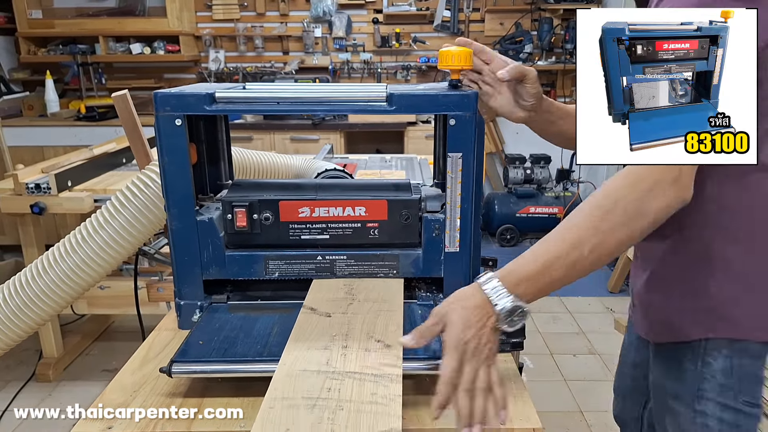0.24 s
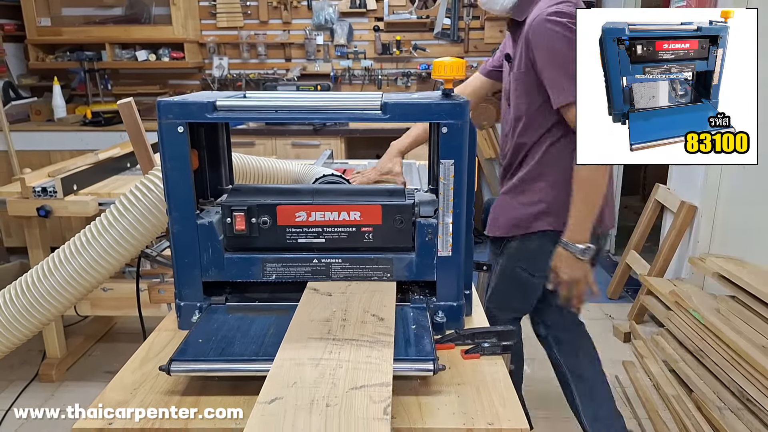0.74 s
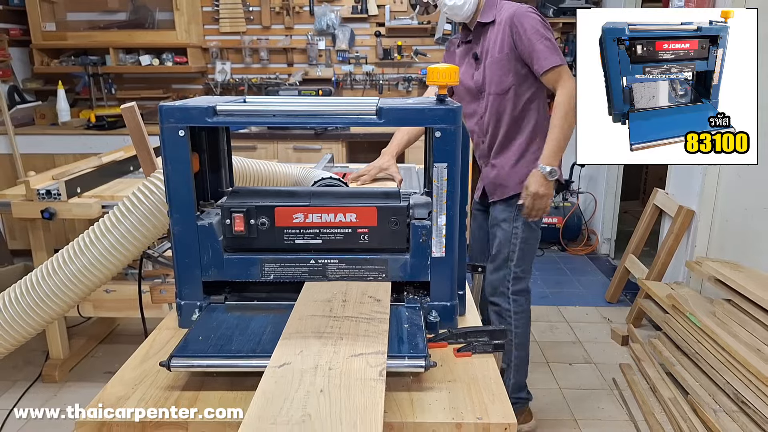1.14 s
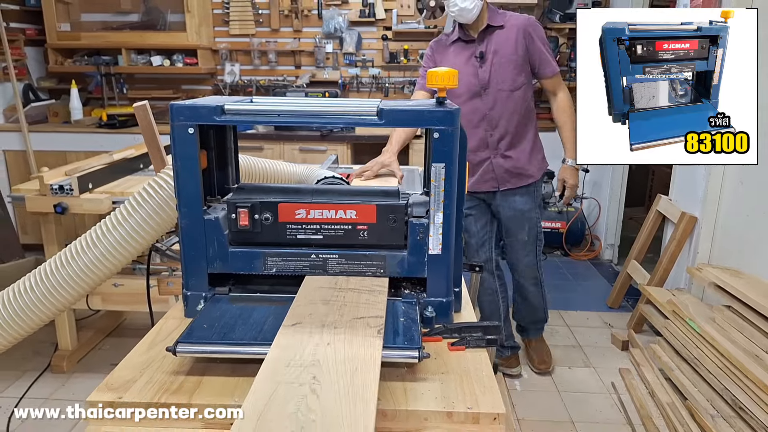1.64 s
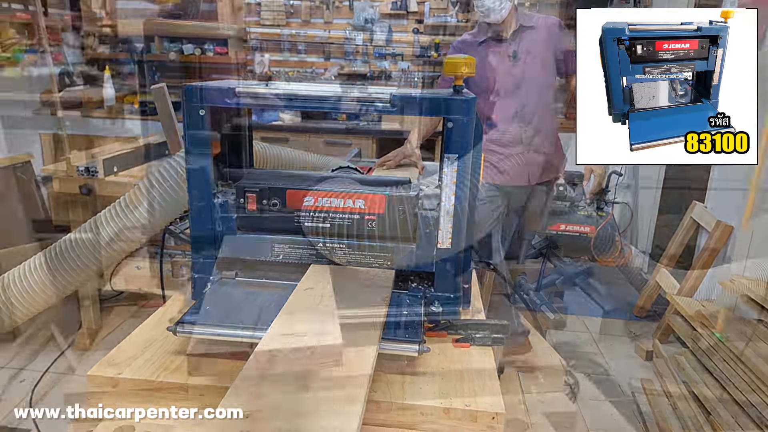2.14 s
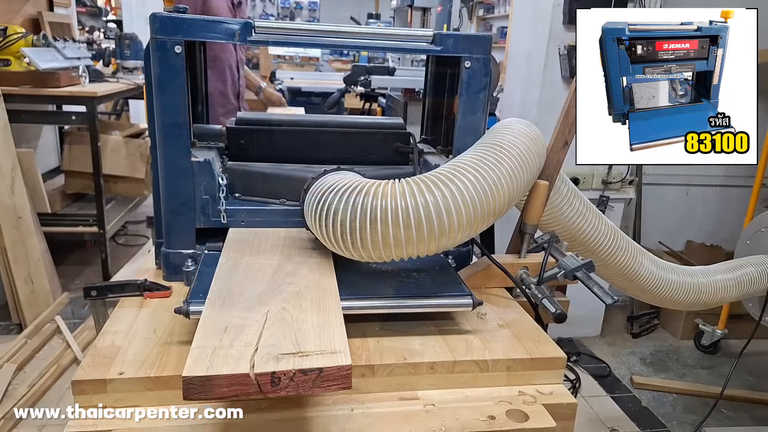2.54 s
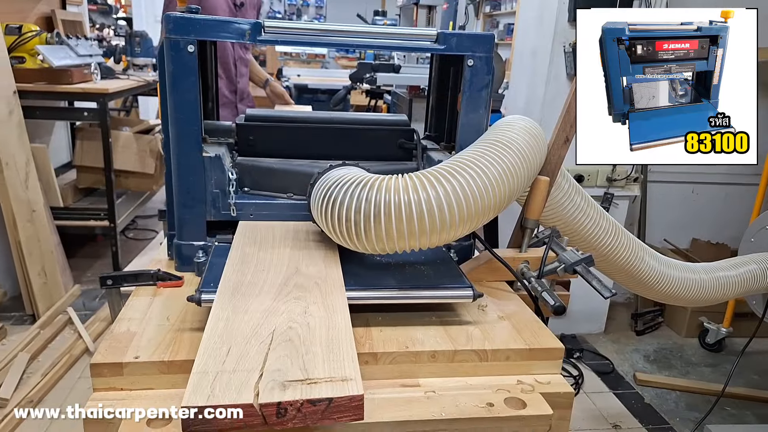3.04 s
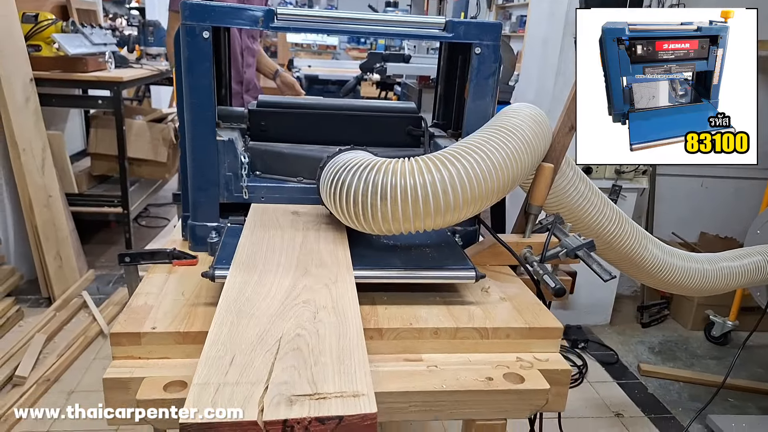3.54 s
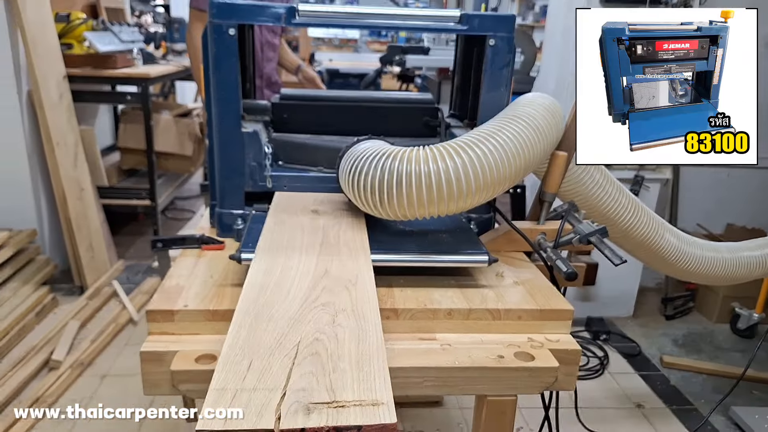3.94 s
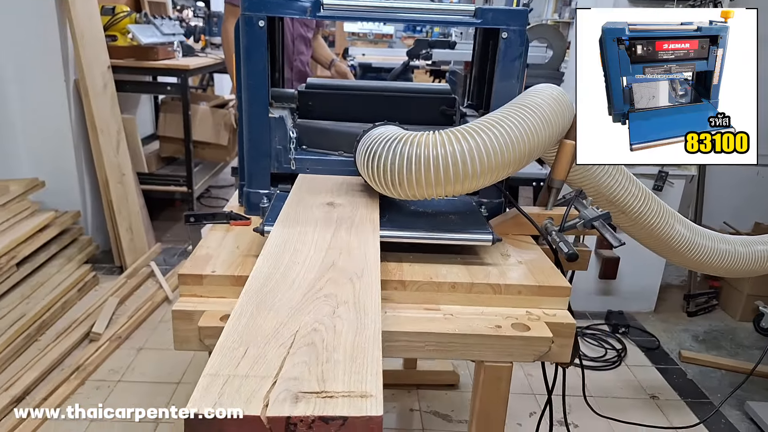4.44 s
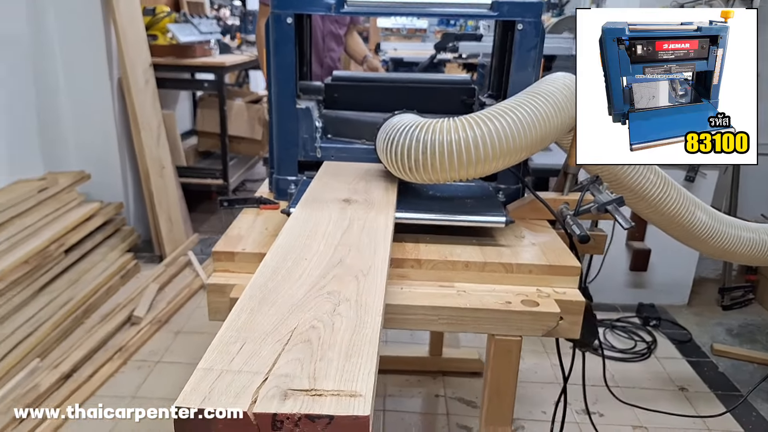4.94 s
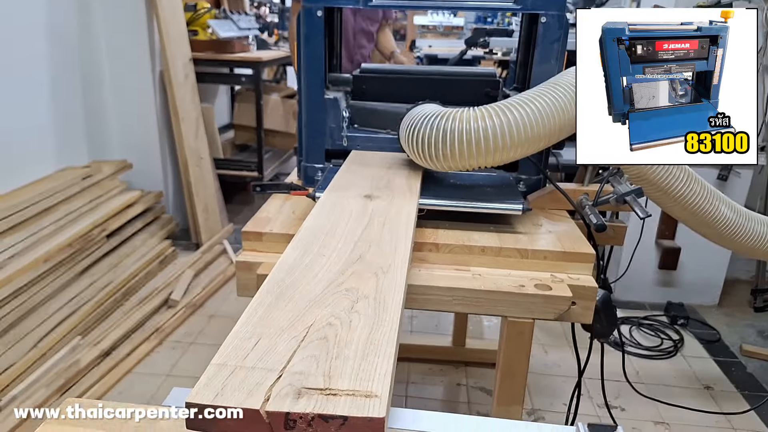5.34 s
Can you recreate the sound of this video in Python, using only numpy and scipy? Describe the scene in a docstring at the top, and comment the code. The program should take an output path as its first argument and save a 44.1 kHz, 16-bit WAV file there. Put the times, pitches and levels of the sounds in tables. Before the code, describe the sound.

Close stereo sound of a thickness planer already at work: fast knife strikes merge into a bright, gritty whine, with single overtones howling and fading. Chips hiss and air rushes. After about two seconds the front view blends into the lower, more muffled outfeed drone, steadier in pitch, with motor tones, belt growl and small low board knocks near the end.

```python
"""A benchtop thickness planer cuts a board, heard first at the infeed: periodic knife strikes sum to a whine
that sags with the load, while as the board moves single harmonics howl or fade.
With it sound chips and air (noise modulated at the strike rate), motor tones, belt growl and an extractor hum.
From 2.125 s to 3 s this dissolves into the duller whine of the outfeed, where chips rush into the dust hose.
From about 3 s on the board knocks on the bed now and then: short swells of a low tone and band noise."""
import sys
import numpy as np
from scipy import signal
from scipy.fft import rfft, irfft, next_fast_len
from scipy.io import wavfile
from scipy.ndimage import map_coordinates

SR = 44100
rng = np.random.default_rng(int(sys.argv[2]) if len(sys.argv) > 2 else 0)


def put_to_file(sound):
    """Save the sound as 16-bit audio at rate SR, in the file named by the first command-line argument."""
    columns = np.atleast_2d(sound).T  # one column per channel
    safe = np.clip(columns, -1, 1)
    whole_steps = np.round(safe * 32767)
    wavfile.write(sys.argv[1], SR, whole_steps.astype(np.int16))


N = 246959
TIME = np.arange(N) / SR
FRAME = 441  # samples between updates of the slowly varying levels
CYCLE = 1024  # points in one stored period of a waveform


def undb(db):
    """Logarithmic level: decibels to amplitude gain."""
    return 10 ** (np.asarray(db) / 20)


def curves(table, t=TIME):
    """Linear interpolation: the columns of a time table at times t, held at its ends."""
    s, *columns = np.transpose(table)
    return [np.interp(t, s, column) for column in columns]


def spectrum(points, hz):
    """Spectral envelope: level in dB interpolated over the logarithm of frequency."""
    f, db = np.transpose(points)
    return np.interp(np.log(hz + 1), np.log(f), db)


def shape(x, gain):
    """Linear filtering: multiply the spectrum by a gain given as a function of frequency."""
    size = next_fast_len(N)
    f = np.arange(size // 2 + 1) * SR / size
    return irfft(rfft(x, size) * gain(f), size)[..., :N]


def unit(x):
    """Normalization to an rms of 1."""
    return x / np.sqrt(np.mean(x ** 2))


def resonance(x, hz, width_hz):
    """Resonance: a steep band-pass about one frequency, scaled to rms 1."""
    return unit(shape(x, lambda f: 1 / (1 + ((f * f - hz * hz) / (f * width_hz + 1)) ** 2)))


def walks(t, rate, count):
    """Slow random modulation: smooth independent walks of spread 1, one column each, rate in knots per s."""
    knots = rng.standard_normal((512, count))
    place = t[:, None] * rate + rng.random(count)
    k, turn = place.astype(int), place % 1 * np.pi / 2
    column = np.arange(count)
    before = knots[k % len(knots), column]
    after = knots[(k + 1) % len(knots), column]
    return before * np.cos(turn) + after * np.sin(turn)  # keeps the spread constant


def ports(mid, side, wide_hz=1600, lag_ms=0.059):
    """Spatial coherence: two microphones agree in the low middle, not in rumble or treble; the left leads."""
    def apart(f):
        rumble = .62 / (1 + (f / 100) ** 4)
        return np.pi / 4 * (f / (f + wide_hz) + rumble)

    mid = shape(mid, lambda f: np.cos(apart(f)))
    side = shape(side, lambda f: np.sin(apart(f)))
    left = shape(mid + side, lambda f: np.exp(2j * np.pi * f * lag_ms / 10 ** 3))
    return np.array([left, mid - side])


def rotation(speed, flutter):
    """Phase integration: running count of knife passes; the speed flutters with the grain of the wood."""
    unsteady = 1 + flutter * walks(TIME, 45, count=1)[:, 0]
    return np.cumsum(curves(speed)[0] * unsteady) / SR


def chatter(turns, jitter):
    """Phase jitter (in passes): knives meet the wood early or late, which roughens the upper harmonics."""
    k = np.arange(int(turns[-1]) + 2)
    return turns + np.interp(turns, k, jitter * rng.standard_normal(len(k)))


def bite(turns, uneven, rough):
    """Amplitude modulation per strike: the two knives differ a little, and so does the wood under each."""
    k = np.arange(int(turns[-1]) + 2)
    strength = 1 + uneven * (-1.) ** k + rough * rng.standard_normal(len(k))
    return np.interp(turns, k, strength)


# Resonances of the moving board that build up and let go again, lifting the harmonics near them:
# (peak time [s], build [s], release [s], frequency [Hz], lift [dB])
HOWLS = [(0.02, 0.05, 0.12, 3825.0, 5.5), (0.05, .06, 0.052, 2915, 6), (0.06, 0.4, 0.15, 3595, 9.5),
         (0.1, 0.055, 0.11, 1560, 10), (0.14, 0.31, 0.45, 1775.0, 7), (0.16, 0.037, 0.071, 2215, 5),
         (0.18, 0.092, 0.16, 883.0, 12.5), (0.22, 0.52, 0.045, 2849.0, 8), (0.26, 0.42, 0.05, 653.0, 8),
         (0.3, 0.26, 0.06, 1510, 18), (0.38, 0.12, 0.2, 3585.0, 8.5), (0.4, 0.17, 0.11, 210.0, 12),
         (0.42, 0.05, 0.22, 5665.0, 4), (0.45, .05, .05, 3345, 2), (0.52, 0.069, .06, 4150, 3),
         (0.54, 0.16, 0.22, 1663.0, 9.5), (0.58, 0.059, 0.1, 2486.0, 9), (0.6, 0.06, 0.21, 5180.0, 13),
         (0.62, 0.13, 0.15, 4351.0, 10), (0.62, .1, 0.059, 1243, 2), (0.66, 0.082, 0.09, 828, 8.5),
         (0.76, 0.055, .06, 3930, 10.5), (0.74, 0.2, 0.077, 1449.0, 7), (0.84, 0.22, 0.13, 2055.0, 9.5),
         (0.96, 0.059, 0.072, 3050, 8), (0.98, .12, .12, 1825, 4), (1.0, 0.048, 0.09, 3240.0, 9),
         (1.05, 0.25, 0.18, 7850.0, 15), (1.25, 0.051, 0.067, 3220, 6), (1.26, 0.35, 0.25, 1007.0, 7),
         (1.34, 0.09, 0.16, 6071.0, 6), (1.35, 0.053, .06, 4252, 5), (1.38, 0.28, 0.45, 410, 3),
         (1.46, 0.061, 0.052, 821.0, 11), (1.65, 0.055, 0.065, 3330, 6), (1.7, .15, 0.16, 2500, 1),
         (1.76, .15, .1, 2925, 2), (1.78, 0.16, 0.087, 4821.0, 5), (1.78, 0.21, 0.14, 5659.0, 11.5),
         (1.85, 0.071, .07, 2718, 6), (1.85, .09, .08, 3972, 5.5), (1.85, .3, .3, 2095, 2.5),
         (1.9, .08, 0.099, 3550, 8), (2.0, .1, .1, 4420, 7), (2.06, 0.042, 0.054, 2961.0, 11.5),
         (2.06, 0.097, 0.13, 1269.0, 5.5), (2.1, 0.05, 0.23, 849.0, 8.5), (2.14, 0.097, 0.47, 5968.0, 7),
         (2.18, 0.076, 0.29, 428.0, 6), (2.8, 0.13, 0.11, 2015.0, 8), (2.9, 0.14, 0.05, 6978.0, 9),
         (2.98, 0.22, 0.047, 3862.0, 9), (2.95, 0.16, 0.16, 3125, 6.5), (3.1, 0.13, 0.18, 3325.0, 4.5),
         (3.16, 0.16, .17, 1660, 5), (3.3, .5, .5, 555, 3), (3.18, 0.05, 0.45, 5909.0, 6),
         (3.26, 0.036, 0.45, 925.0, 6), (3.42, 0.09, 0.097, 2769.0, 7.5), (3.5, 0.15, 0.044, 2215.0, 10),
         (3.68, 0.16, 0.21, 3143.0, 7.5), (3.8, 0.24, 0.088, 2590.0, 5), (3.86, 0.057, 0.052, 3888, 9),
         (3.9, .13, 0.069, 2035, 3), (2.9, 0.17, 0.27, 1120, 2.5), (3.92, 0.61, 0.08, 1109.0, 6),
         (3.95, .15, .15, 1665, 3.5), (3.96, 0.064, 0.069, 1470.0, 8.0), (4.02, 0.13, 0.09, 3845.0, 10),
         (4.27, 0.057, 0.038, 1105, 4.5), (4.28, 0.068, .1, 1472, 4.5), (4.33, 0.089, 0.065, 2375, 4),
         (4.44, 0.062, .06, 910, 7.5), (4.5, 0.34, 0.13, 2920.0, 6), (4.8, 0.08, 0.1, 3870, 11.5),
         (4.92, 0.27, .25, 2050, 3), (4.9, 0.48, 0.1, 2959.0, 5.5), (4.97, 0.19, 0.11, 3157.0, 6),
         (5.15, 0.21, 0.2, 2420.0, 6), (5.22, 0.23, 0.27, 2801.0, 11.5), (5.4, 0.057, 0.16, 2997.0, 8),
         (5.42, 0.64, 0.68, 750.0, 5.5), (5.5, 0.38, 0.099, 943.0, 6.5), (5.55, 0.089, 0.07, 1693.0, 5),
         (5.55, 0.14, 0.16, 1500, 4.5)]
# Moments when harmonics near one frequency fade and return; a negative depth makes them swell instead:
# (extreme time [s], onset [s], return [s], frequency [Hz], depth [dB])
FADES = [(0.05, .08, .1, 3140, 5), (0.18, 0.23, 0.13, 2460, 5), (0.22, 0.091, .07, 4300, 2),
         (0.25, .06, .06, 4180, 3), (0.35, 0.039, .04, 1275, 3), (0.42, 0.14, .06, 3200, 6),
         (0.46, 0.05, 0.25, 2700, 9), (0.47, 0.06, 0.23, 3753.0, 16), (0.7, 0.066, 0.07, 2277, 9),
         (0.86, 0.18, 0.05, 3400, -6), (1.0, 0.33, 0.35, 4420, 6.5), (1.15, .1, 0.17, 2005, 3),
         (1.2, .15, .08, 3810, 7), (1.34, 0.3, 0.097, 3930, 11.0), (1.46, 0.049, 0.13, 3720, 9),
         (1.55, 0.15, 0.3, 4130, 14.0), (2.12, 0.34, 0.21, 3177, 10), (2.26, 0.45, 0.15, 3900, 14),
         (2.27, .08, .15, 2365, 8), (3.18, 0.21, 0.05, 3500, 21), (3.3, 0.21, 0.13, 2036.0, 9),
         (3.34, 0.05, 0.49, 4160, 18), (3.82, 0.35, 0.05, 1470, 15), (3.86, 0.066, 0.1, 3518.0, 10),
         (3.94, 0.53, 0.074, 1842.0, 2), (3.96, 0.049, 0.088, 925, 7), (4.06, 0.06, 0.13, 732, 8),
         (4.25, 0.065, 0.066, 3153, 5), (4.1, 0.07, 0.09, 1092, 1), (4.44, 0.12, 0.15, 1100, 5),
         (4.8, 0.16, 0.25, 1470, 8), (4.86, 0.061, 0.044, 2790, 13), (4.86, 0.1, 0.15, 1658, 13),
         (4.86, 0.076, 0.45, 1820, 17), (4.86, 0.2, 0.25, 3480, 9), (5.06, 0.05, 0.36, 1500, 3.5),
         (5.25, .05, .05, 3080, 8.5), (5.3, 0.12, 0.05, 2270, 9), (5.42, 0.12, 0.12, 2670, 21),
         (5.46, 0.056, 0.25, 2035, 25), (5.56, 0.091, .1, 3385, 6), (5.58, 0.11, .1, 1129, 7)]


def howls(t, f, width_hz=77):
    """Resonant gain and selective fading: change in dB of harmonics at frequencies f (times x harmonics)."""
    lift = 0
    for table, sign in ((HOWLS, 1), (FADES, -1)):
        for s, build, release, hz, db in table:
            swell = np.exp(-((t - s) / np.where(t < s, build, release)) ** 2)
            nearness = 1 / (1 + ((f - hz) / width_hz) ** 2) ** 2
            lift = lift + sign * db * swell[:, None] * nearness
    return lift


def harmonics(t, f, cut, strike, treble, whine_db, patchy_db, flicker_db,
              patchy_rate=5, flicker_rate=30, low_share=0.54):
    """Fourier series: each harmonic's level in dB at times t, from strike shape, cut and random unrest."""
    low_hz, treble_hz = 1650, 3410  # lower harmonics follow the cut less; above treble_hz the treble level rules
    middle_db, treble_db = curves(cut, t)
    _, usual_db, usual_treble_db = np.mean(cut, axis=0)
    order = np.arange(1, len(f) + 1)
    k, strike_db = np.transpose(strike)
    shape_db = np.where(order <= len(k), np.interp(order, k, strike_db), spectrum(treble, f))
    top = (f > treble_hz).astype(float)
    middle = np.clip(f / low_hz, 0, 1) ** 2 * (1 - top)
    db = shape_db + usual_db + whine_db
    db = db + np.outer(middle_db - usual_db, middle) + np.outer(treble_db - usual_treble_db, top)
    # the moving board shifts the standing waves, so harmonics come and go, the low ones less
    unrest = patchy_db * walks(t, patchy_rate, count=len(f))
    unrest = unrest + flicker_db * walks(t, flicker_rate, count=len(f))
    return db + np.interp(f, (low_hz * 2 / 3, low_hz), (low_share, 1)) * unrest


def ringing(db):
    """Minimum phase: the phases, from the cepstrum, of a sharp blow followed by the ring of its resonances."""
    cepstrum = irfft(np.pad(db, ((0, 0), (1, 0)), mode="edge") * np.log(10) / 20)
    cepstrum[:, cepstrum.shape[1] // 2:] = 0
    return 2 * rfft(cepstrum).imag[:, 1:]


def knives(turns, speed, cut, strike, treble, whine_db, smear, patchy_db, flicker_db, spread, lag_ms,
           pan_db=-1.6, direct=0.97):
    """Periodic excitation: one strike per knife pass, summed from 80 harmonics for each microphone."""
    t = np.arange(N // FRAME + 2) * FRAME / SR
    hz = np.outer(curves(speed, t)[0], np.arange(1, 81))
    f = np.mean(hz, axis=0)
    lift_db = howls(t, hz)
    db = harmonics(t, f, cut, strike, treble, whine_db, patchy_db, flicker_db) + lift_db
    # reflections scatter the phases (smear in radians) and so spread the strike in time
    phase = ringing(db) + smear * walks(t, 1.271, count=len(f))
    # they reach each microphone differently; howling harmonics arrive more directly
    diffuse = spread * f / (f + 750) * undb(-direct * np.maximum(lift_db, 0))
    level_walk = 0.47 * walks(t, 3.426, count=len(f))
    phase_walk = walks(t, 3.525, count=len(f))
    pan = np.log(undb(pan_db / 2)) * np.clip(f / 2000, 0, 1)
    lead = np.pi * f * lag_ms / 10 ** 3
    between = diffuse * (level_walk + 1j * phase_walk) + pan + 1j * lead  # half the log ratio, left to right
    balance = np.sqrt(np.cosh(2 * between.real))  # keeps the summed power of the two sides
    out = []
    for sign in (1, -1):
        partials = undb(db) * np.exp(1j * phase + sign * between) / balance
        cycle = irfft(np.pad(partials, ((0, 0), (1, 0))), CYCLE) * CYCLE / np.sqrt(2)
        place = [np.arange(N) / FRAME, turns % 1 * CYCLE]
        out.append(map_coordinates(cycle, place, order=1, mode="grid-wrap"))
    return np.array(out)


def tumble(x, depth_db, rate=32, per_octave=4.06, knee_hz=600):
    """Band-wise modulation: chips tumble in clumps of many sizes, so the middle bands flare separately."""
    f, t, z = signal.stft(x, SR, nperseg=512)
    bands = per_octave * np.log2(1 + f / knee_hz)
    band, frame = np.meshgrid(bands, np.arange(len(t)), indexing="ij")
    flare = map_coordinates(walks(t, rate, count=24), [frame, band], order=1, mode="nearest")
    middle = f / (f + knee_hz) / (1 + (f / 7000) ** 2)
    return signal.istft(z * undb(depth_db * flare * middle[:, None]), SR)[1][..., :N]


def chips(turns, flow, colour, burst, tick_db, pan_db, tumble_db, surge_db=1.3):
    """Modulated noise: knives tear off bursts of chips that tick on the hood; the air rasps in step."""
    chip_db, air_db = curves(flow)
    passing = turns % 1
    gate = unit(1 + burst * np.exp(-passing / 0.15))
    # random impacts, on average 900 per s, whose power dies away in 0.42 ms
    ticks = (rng.random(N) < 900 / SR) * undb(1.4 * np.minimum(rng.exponential(size=N), 5))
    scatter = signal.lfilter([1], [1, -np.exp(-1 / (0.00042 * SR))], ticks ** 2)
    grain = unit(np.sqrt(gate ** 2 + undb(tick_db) ** 2 * scatter / np.mean(scatter)))
    grain = grain * undb(surge_db * walks(TIME, 21.74, count=1)[:, 0])
    rasp = unit(1 + 1.2 * np.exp(-passing / 0.36))  # the air swells as each knife passes

    def tone(f):
        return undb(spectrum(colour, f))

    def treble_share(f):
        return f ** 2 / (f ** 2 + 2200 ** 2)

    hiss = ports(*(rng.standard_normal((2, N)) * grain))
    hiss = shape(hiss, lambda f: tone(f) * np.sqrt(treble_share(f)))
    air = ports(*(rng.standard_normal((2, N)) * rasp))
    air = shape(air, lambda f: tone(f) * np.sqrt(1 - treble_share(f)))
    pan = undb(np.array([[pan_db], [-pan_db]]) / 2)
    return tumble(unit(hiss) * undb(chip_db) * pan + unit(air) * undb(air_db), tumble_db)


# Tone of the motor shaft: (time [s], level [dB])
MOTOR = [(0, -63), (.55, -43), (.95, -58), (2.2, -45.5), (3.0, -42), (3.4, -66), (4.1, -44.5), (4.55, -44),
         (4.85, -38.5), (5.2, -57)]
# Fainter tones of fan and drive: (multiple of the strike rate [1], infeed level [dB], outfeed level [dB])
DRIVE = [(1.846, -53, -63), (4.55, -55, -60), (4.77, -62, -53), (5.2, -70, -51), (6.765, -48, -49.5),
         (9.42, -73, -55), (13.66, -62, -52), (29.74, -54.5, -64)]


def motor(turns, side, shaft_ratio=2.612, waver_db=1.0):
    """Fixed transmission ratio: the belt ties motor and fan to the cutter block, so their tones sag with it."""
    frames = TIME[::FRAME]
    waver = walks(frames, 4.82, count=len(DRIVE)).T
    tones = np.sin(2 * np.pi * shaft_ratio * turns) * undb(curves(MOTOR)[0])
    for row, wander in zip(DRIVE, waver):
        level = np.interp(TIME, frames, undb(row[side] + waver_db * wander))  # column 1 infeed, 2 outfeed
        tones = tones + np.sin(2 * np.pi * row[0] * turns) * level
    return np.sqrt(2) * tones


def belt(turns, db, passes=5, low_hz=750, high_hz=3600):
    """Subharmonic periodicity: clatter repeating every 5 passes growls in close lines between the harmonics."""
    place = [turns / passes % 1 * CYCLE]
    clatter = [map_coordinates(c, place, order=1, mode="grid-wrap") for c in rng.standard_normal((2, CYCLE))]

    def band(f):
        return (f / low_hz) ** 2 / np.sqrt((1 + (f / low_hz) ** 4) * (1 + (f / high_hz) ** 6))

    return unit(shape(ports(*clatter), band)) * undb(db)


# Speed of the cutter block, sagging with the load: (time [s], strike rate [Hz])
INFEED_SPEED = [(0.0, 225.4), (0.18, 220.9), (0.291, 216.5), (0.39, 210.1), (0.58, 207), (0.73, 207.1),
                (0.99, 203.1), (1.08, 200.4), (1.13, 199.9), (1.36, 202.8), (1.53, 206.9), (1.79, 209.2),
                (1.94, 208.9), (2.36, 216.6), (2.45, 218.9)]
# Course of the whine's level: (time [s], relative middle level [dB], relative treble level [dB])
INFEED_CUT = [(0.02, -26, -27), (0.2, -26.5, -25), (0.35, -22, -29), (0.47, -21.5, -29), (0.6, -28, -27.5),
              (0.78, -23.5, -27.5), (0.921, -26, -29), (1.05, -22.5, -27.5), (1.3, -25.5, -28.5),
              (1.49, -30.5, -31), (1.6, -25, -29.5), (1.72, -27.5, -33), (1.86, -25.5, -30),
              (1.972, -30.5, -33), (2.08, -29, -30.5), (2.25, -27, -37), (2.45, -27.5, -34)]
# Shape of a knife strike: (harmonic number [1], relative level [dB])
INFEED_SHAPE = [(1, -22), (2, 0.5), (3, -12), (4, -4.5), (5, -5), (6, 2.5), (7, -4), (8, -4), (9, -3.5),
                (10, 1.5), (11, 2.5), (12, -1.5), (13, -1.5), (14, 2.5), (15, 2), (16, -1.5), (17, -2),
                (18, 1.5), (19, -1.5), (20, -3.5), (21, -4), (22, -3), (23, -5), (24, -5.5), (25, -4.5),
                (26, -5), (27, -9), (28, -6.5)]
# The strike's treble above those harmonics: (frequency [Hz], relative level [dB])
INFEED_TREBLE = [(6000, -11), (7000, -10.5), (8500, -13), (10000, -19), (12300, -18.5), (13500, -22),
                 (15000, -29)]
# Hiss of the chips and rush of the air: (time [s], chip level [dB], air level [dB])
INFEED_FLOW = [(0, -37.5, -33), (.3, -31, -31.5), (.6, -36, -31.5), (.9, -31.5, -31.5), (1.3, -34.5, -33.5),
               (1.8, -32.5, -32.5), (2.2, -34.5, -33)]
# Colour of the noise between the harmonics: (frequency [Hz], relative spectral density [dB])
INFEED_NOISE = [(30, -31), (60, -19.5), (100, -14.5), (160, -15), (250, -7), (340, -7.5), (700, -5),
                (1100, 1), (1600, -1), (2600, 1), (3700, 4), (4800, 3), (6500, 3), (8300, 4), (10300, -4.5),
                (11400, -1), (12200, 3.5), (13200, -1.5), (14200, 1), (15500, -5.5)]


def infeed():
    """Direct radiation: at the front the strikes come straight out of the slot."""
    turns = rotation(INFEED_SPEED, flutter=0.001444)
    whine = knives(chatter(turns, jitter=0.00048), INFEED_SPEED, INFEED_CUT, INFEED_SHAPE, INFEED_TREBLE,
                   whine_db=-11.5, smear=0.68, patchy_db=0.9, flicker_db=2.5, spread=0.88, lag_ms=0.072)
    whine = whine * bite(turns, uneven=0.013, rough=0.072)
    hiss = chips(turns, INFEED_FLOW, INFEED_NOISE, burst=1.5, tick_db=-20, pan_db=-2.0, tumble_db=2.5)
    return whine + motor(turns, side=1) + belt(turns, db=-44) + hiss


def extractor(hz=145.0, db=-65, waver_db=2.0):
    """Pure tone: the dust extractor hums at a steady pitch while its level wavers slowly."""
    level = undb(db + waver_db * walks(TIME, 4.6, count=1)[:, 0])
    return np.sqrt(2) * np.sin(2 * np.pi * hz * TIME) * level


# Speed of the cutter block under load: (time [s], strike rate [Hz])
OUTFEED_SPEED = [(2.5, 183.4), (2.62, 182.3), (3.329, 184.9), (3.44, 184.4), (3.87, 185.3), (4.1, 182.3),
                 (4.24, 184.7), (4.39, 181.6), (4.85, 184.3), (5.13, 187.1), (5.24, 186.8), (5.44, 187.1),
                 (5.52, 188.5), (5.6, 188)]
# Course of the whine's level: (time [s], relative middle level [dB], relative treble level [dB])
OUTFEED_CUT = [(2.5, -26, -29.5), (2.661, -26, -28.5), (2.75, -25, -26.5), (2.92, -29, -28.5),
               (3.15, -26, -27.5), (3.44, -27, -27), (3.7, -27, -27.5), (3.9, -27, -29), (4.12, -26, -32),
               (4.26, -26.5, -29), (4.4, -29, -33), (4.55, -29.5, -32.5), (4.88, -20.5, -32),
               (5.06, -25.5, -31), (5.3, -26.5, -29.5), (5.42, -26, -28.5), (5.56, -21, -26)]
# Shape of a knife strike: (harmonic number [1], relative level [dB])
OUTFEED_SHAPE = [(1, -27), (2, -8.5), (3, -12), (4, -8), (5, -8), (6, 2.5), (7, -9), (8, -5), (9, -7.5),
                 (10, -7.5), (11, -4.5), (12, -13.5), (13, -7), (14, -7), (15, -9), (16, -8), (17, -8),
                 (18, -7.5), (19, -4), (20, -8.5), (21, -16.5), (22, -10), (23, -10.5), (24, -16.5),
                 (25, -14), (26, -13.5), (27, -18), (28, -18)]
# The strike's treble above those harmonics: (frequency [Hz], relative level [dB])
OUTFEED_TREBLE = [(5300, -19), (5900, -15), (6400, -20), (7200, -16.5), (8500, -24), (10000, -22),
                  (15000, -30)]
# Hiss of the chips and rush of the air: (time [s], chip level [dB], air level [dB])
OUTFEED_FLOW = [(2.5, -31, -32), (3.0, -33, -31.5), (3.45, -32.3, -30.4), (3.9, -33, -31.5),
                (4.3, -31.8, -30.7), (4.65, -32, -31.2), (4.899, -31, -30.5), (5.6, -36, -31.5)]
# Colour of the noise between the harmonics: (frequency [Hz], relative spectral density [dB])
OUTFEED_NOISE = [(30, -35), (60, -26), (100, -22), (160, -16), (250, -8.5), (600, -8), (950, -0.5),
                 (1600, -2.5), (2700, 0.5), (3800, 2.5), (5000, 0.5), (8000, 3.5), (10300, -3),
                 (12200, 0.5), (15500, -4)]


def outfeed():
    """Transmission loss: at the rear the hood muffles the strikes and the chips rush into the hose."""
    turns = rotation(OUTFEED_SPEED, flutter=0.00089)
    whine = knives(chatter(turns, jitter=0.00046), OUTFEED_SPEED, OUTFEED_CUT, OUTFEED_SHAPE, OUTFEED_TREBLE,
                   whine_db=-4.5, smear=1.05, patchy_db=0.87, flicker_db=1.96, spread=0.91, lag_ms=0.046)
    whine = whine * bite(turns, uneven=0.019, rough=0.066)
    hiss = chips(turns, OUTFEED_FLOW, OUTFEED_NOISE, burst=0.55, tick_db=-11, pan_db=-4.5, tumble_db=3.0)
    return whine + motor(turns, side=2) + belt(turns, db=-38) + hiss


# Knocks of the board on the bed: (time [s], length [s], level [dB])
KNOCKS = [(3.05, .05, -46), (3.113, 0.056, -46), (3.545, 0.076, -43), (3.606, .05, -45),
          (5.146, 0.044, -35.5), (5.325, 0.066, -37.5)]


def knocks(hz=240, rattle_db=-3):
    """Bending vibration: the board shudders on the bed in a low mode with a short rattle above it."""
    swell = sum(undb(db) * np.exp(-(2 * (TIME - s) / length) ** 2) for s, length, db in KNOCKS)
    bending = np.sqrt(2) * np.sin(2 * np.pi * hz * TIME + 0.3 * walks(TIME, 50, count=1)[:, 0])
    rattle = undb(rattle_db) * resonance(rng.standard_normal(N), 380, width_hz=790)
    return swell * (bending + rattle)


def scene(start=2.125, end=3.0):
    """Superposition: the front dissolves linearly into the rear, so the level dips between them."""
    rear = np.clip((TIME - start) / (end - start), 0, 1)
    return (1 - rear) * infeed() + rear * outfeed() + extractor() + knocks()


def record(dry):
    """Band limitation: a steep elliptic low-pass removes the sound above 15600 Hz."""
    return signal.sosfilt(signal.ellip(10, .2, 80, 15600, fs=SR, output="sos"), dry)


dry = scene()
out = record(dry)
put_to_file(out)
```